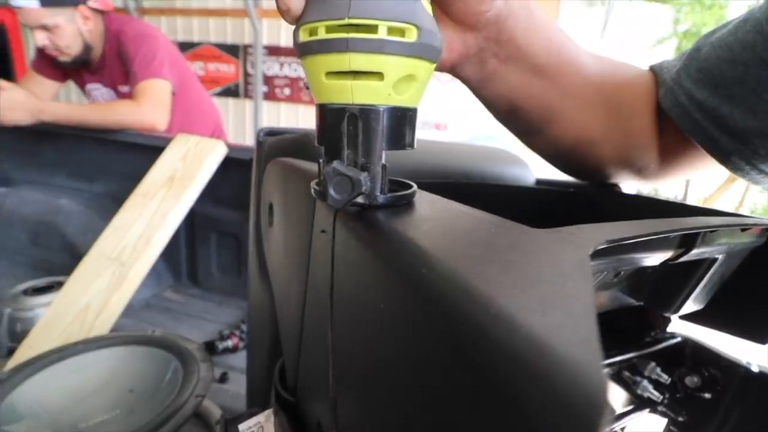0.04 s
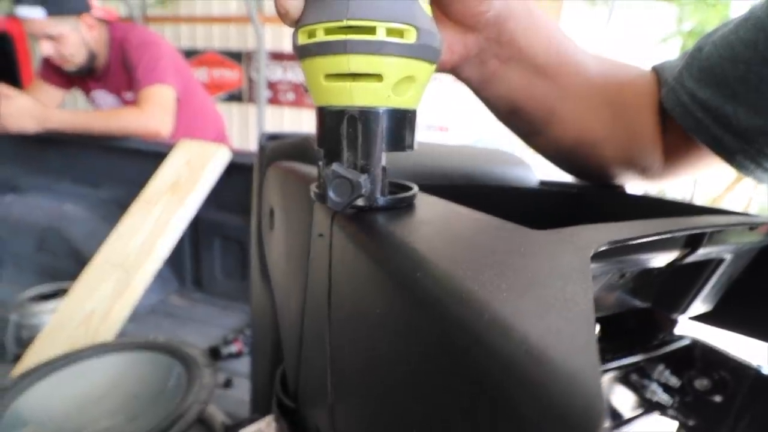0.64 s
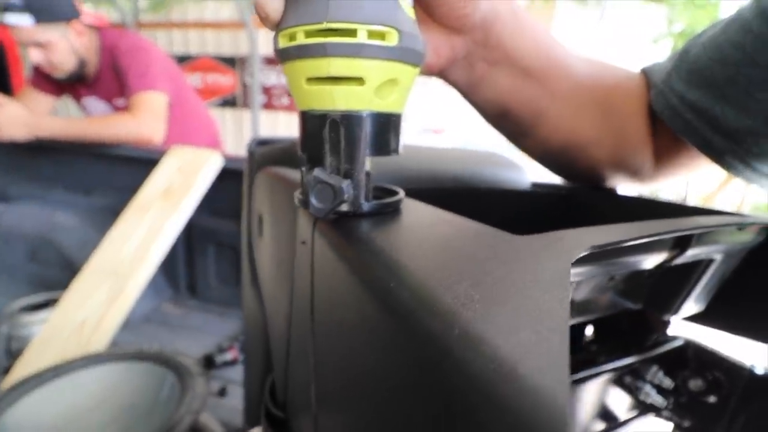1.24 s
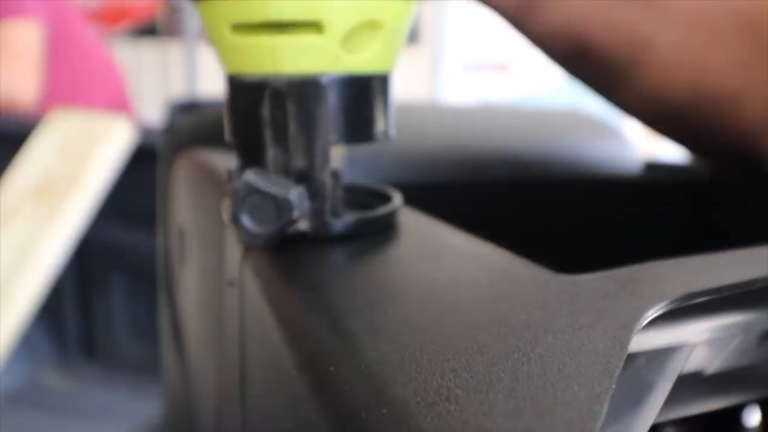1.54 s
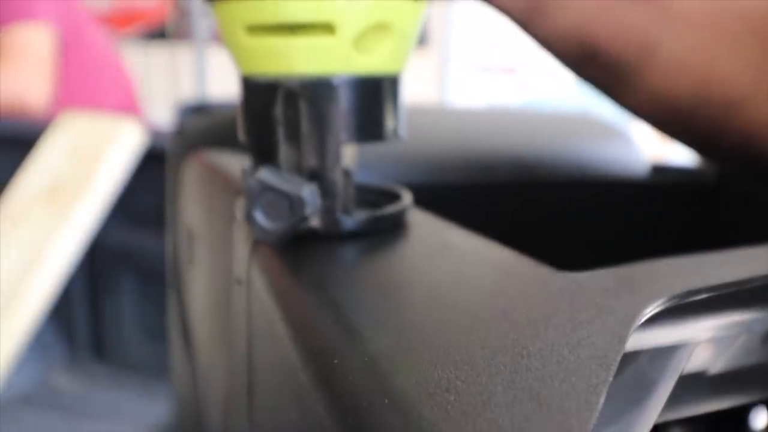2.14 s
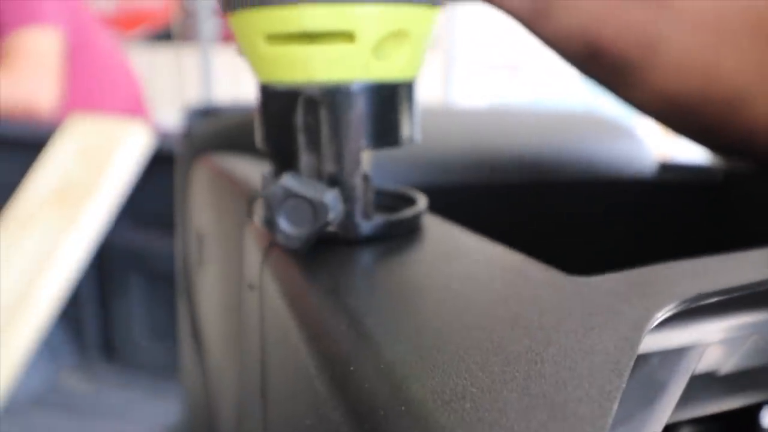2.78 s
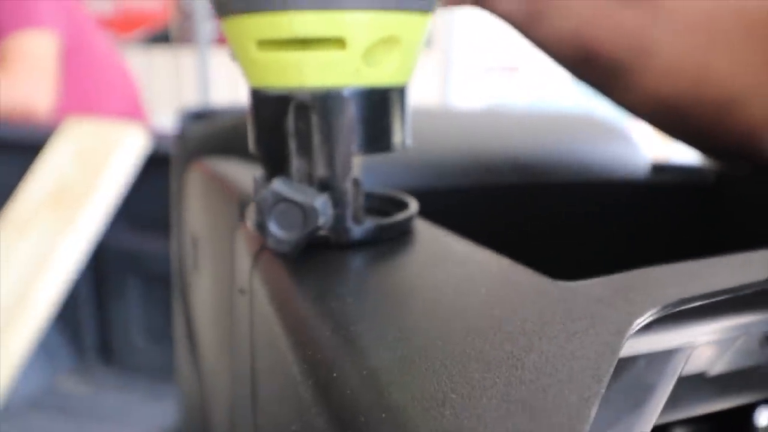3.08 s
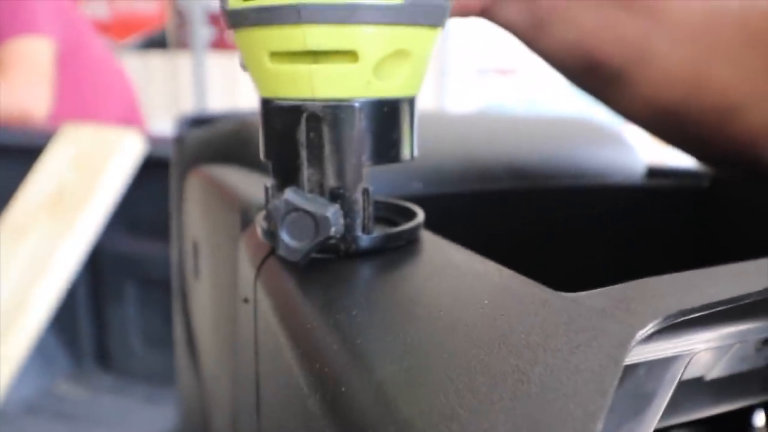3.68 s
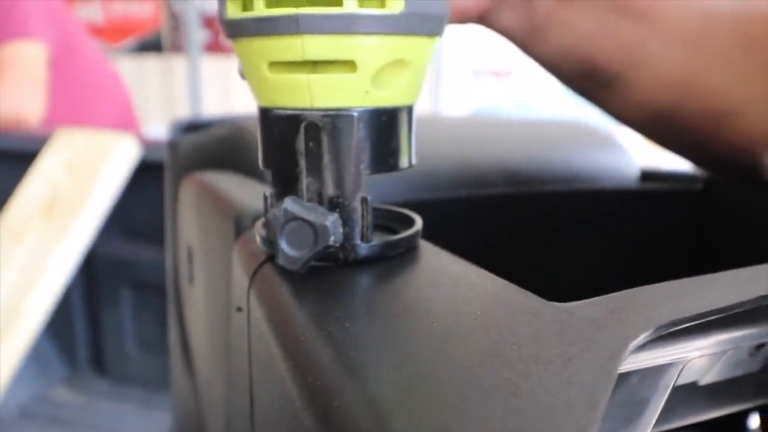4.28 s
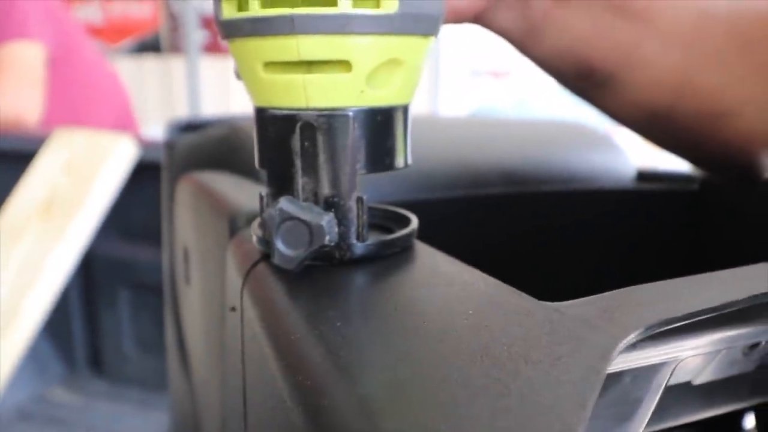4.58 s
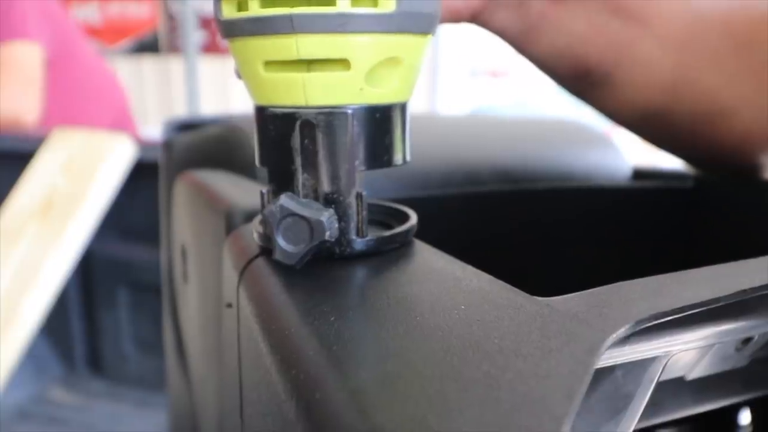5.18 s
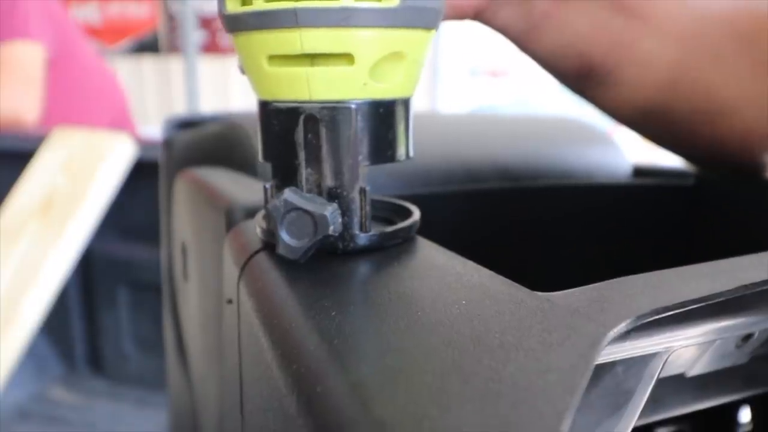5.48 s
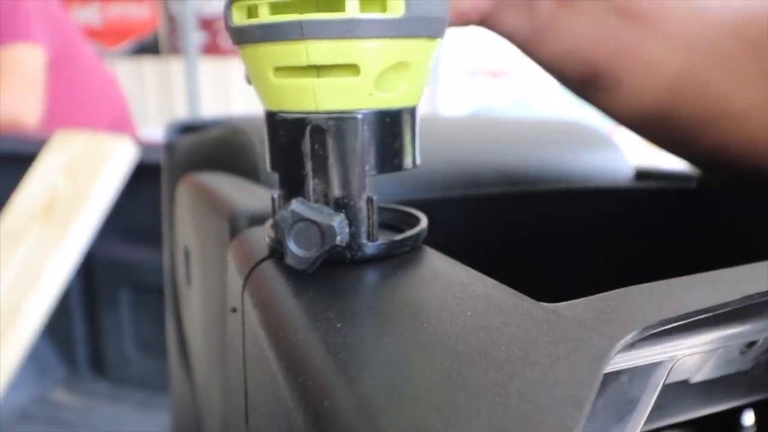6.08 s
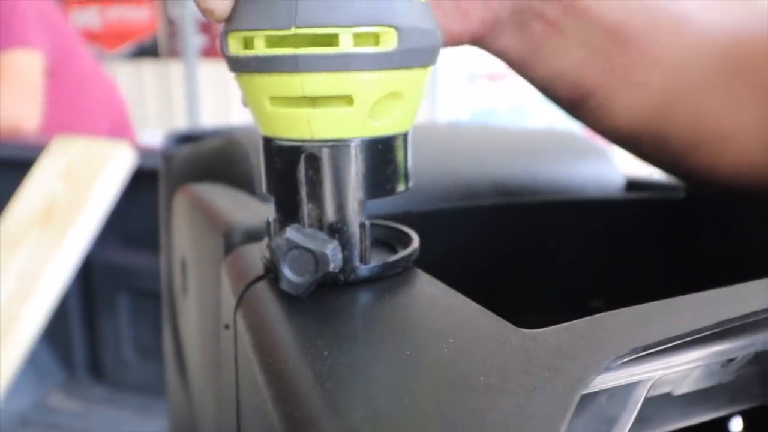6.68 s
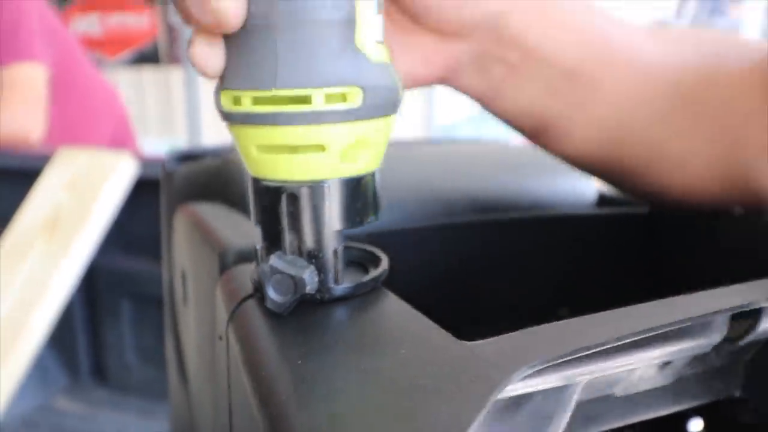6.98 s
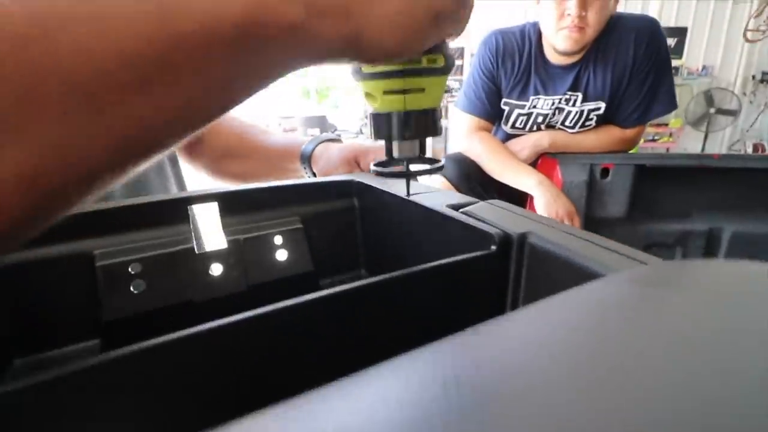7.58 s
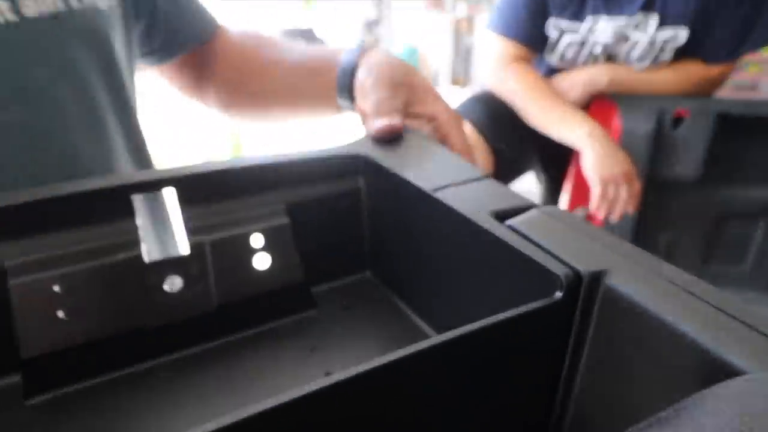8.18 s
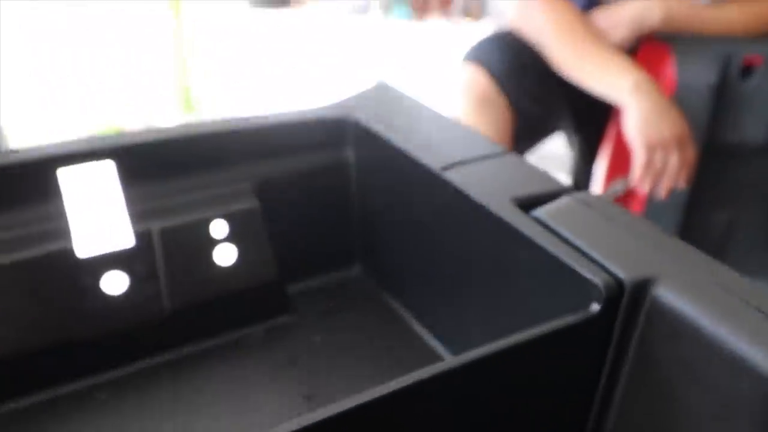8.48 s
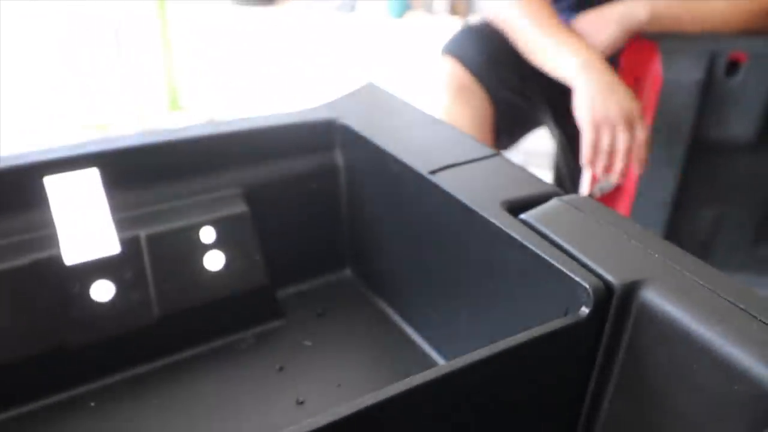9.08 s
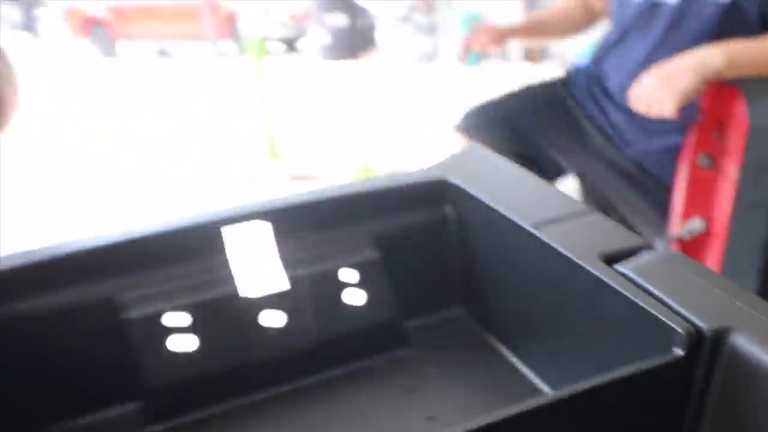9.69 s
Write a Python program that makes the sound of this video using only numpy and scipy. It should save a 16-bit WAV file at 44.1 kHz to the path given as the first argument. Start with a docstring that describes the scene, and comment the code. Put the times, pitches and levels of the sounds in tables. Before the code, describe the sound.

A small high-speed power tool whines steadily while cutting a hollow plastic panel, bites in with a rough rattle, then runs free.

```python
"""A steady hum and whine over hissing air: a cordless rotary cutter works along a plastic console.
The shaft, at about 24000 rpm, gives harmonics; its slower bearing cage puts tones between them, and
the cooling fan hisses. The base plate bumps the hollow panel, and the bit squeals and scrapes.
After a brief dropout near 7 s the bit bites deep and chatters its way out. The tool is then carried
around spinning freely, while the rumble of the workshop and the hum of a shop fan swell."""
import sys
import numpy as np
from scipy import signal
from scipy.fft import rfft, irfft
from scipy.io import wavfile

SR = 44100
rng = np.random.default_rng(int(sys.argv[2]) if len(sys.argv) > 2 else 0)


def log_audio(samples):
    """Write samples as a 16-bit WAV file to the path given in sys.argv[1]."""
    # one column per channel
    frames = np.atleast_2d(samples).T
    # limit to full scale, then quantise
    limited = np.clip(frames, -1, 1)
    pcm = np.round(limited * 32767).astype(np.int16)
    wavfile.write(sys.argv[1], SR, pcm)


N = 434385
TIME = np.arange(N) / SR
BAND_LIMIT_HZ = 15800
DROPOUT_S, RESUME_S, RESTORED_S = 7.027, 7.088, 7.102

# Progress of the work. Each row: time in seconds, stage (0 entering, 1 cutting, 2 biting deep, 3 free).
STAGE = [(0, 0), (1.48, 0), (1.5, 1), (7.04, 1), (7.08, 2), (7.6, 2), (7.75, 3), (9.85, 3)]
# Pressure of the deep bite. Each row: time in seconds, load from 0 to 1.
LOAD = [(7.04, 0), (7.08, 1), (7.21, 1), (7.29, .7), (7.34, 0)]
# Shaft speed. Each row: time in seconds, turns per second.
CUT_SPEED = [(0, 395.3), (1.46, 395.6), (1.51, 394.4), (1.9, 394.3), (3.1, 395.4), (4.29, 394.9),
             (4.5, 395.4), (5.1, 394.8), (5.5, 396.3), (5.72, 393), (5.79, 392.8), (5.91, 396.2),
             (6.08, 397.1), (6.21, 396.1), (7.03, 398.6)]  # sags where the bit catches
RECOVERY_SPEED = [(7.08, 383.8), (7.17, 384.7), (7.31, 382.5), (7.36, 386), (7.42, 386.1), (7.47, 392),
                  (7.62, 400), (7.99, 402), (8.4, 401.8), (9.5, 402.8), (9.85, 402.3)]  # dragged down by the deep bite, then recovering

# Shaft harmonics. Each row: order (multiple of the shaft rate), base level in dB at each of the stages.
HUM = [(1, -24, -30.5, -42, -31.5), (2, -33, -23, -29, -50.5), (3, -32, -31, -44, -38.5),
       (4, -28, -28, -28, -29.5)]
WHINE = [(5, -35.5, -39.5, -37, -40), (6, -34.5, -35.5, -34, -44.5), (7, -35.5, -35, -50, -44),
         (18, -32, -30.3, -44, -33)]  # the last row is the commutator
OVERTONES = [(8, -40, -43, -45, -47), (9, -52, -45, -43, -44), (10, -50, -38.5, -54, -36),
             (11, -43, -42, -44, -38), (12, -38.5, -36, -41, -40.5), (13, -33, -36, -54, -39.5),
             (14, -34, -36.5, -59, -37), (15, -39, -42.5, -57, -41), (16, -47, -53, -49, -52),
             (17, -47, -58, -58, -42), (19, -47, -41.5, -53, -46), (20, -59, -62, -51, -45),
             (21, -54, -50.5, -56, -42), (22, -58, -101, -49.5, -46), (24, -45, -47.5, -52, -51),
             (26, -45, -51, -47, -74), (30, -45, -56, -50, -54), (33, -56, -53, -66, -63)]
# Swings of single harmonics. Each row: time in seconds, gain in dB.
UNBALANCE_GAIN = [(1.47, -2.5), (1.5, 3), (2.7, 0), (3.1, 2), (3.8, 2), (4.9, -2.5), (6.4, -2.5),
                  (7.03, -0.5), (7.08, 4)]  # order 1
FEED_GAIN = [(0.15, -11), (0.45, -0.5), (1.47, 1), (1.5, -2.5), (2.4, -4), (3.1, -1.5), (4.5, 0.5),
             (5.3, 4.5), (5.72, 2), (6.15, 4), (6.85, 0.5), (7.08, 0.5)]  # order 2, driven by feed pressure
THIRD_GAIN = [(0, -11), (0.6, -8.5), (1.3, 1), (2.2, -3), (3.6, 2.5), (4.9, 0), (5.8, -1.5), (6.4, 3),
              (7.08, 9)]
FOURTH_GAIN = [(0, 3), (0.3, 3), (1.47, -3.5), (1.5, -24), (2.2, -6), (2.65, -0.5), (3.3, 0.5), (3.8, 4.5),
               (4.2, 3.5), (4.9, -5.5), (5.3, 3), (5.7, 1), (7.08, -2)]  # varies as the base plate slides
SIXTH_GAIN = [(0, 2), (0.5, -12), (1.5, 5.5), (2.4, 4), (2.68, -4), (2.87, 7), (3.35, 7), (3.9, -1),
              (5.1, -1), (5.35, -12), (5.75, 3.5), (7.08, 2)]
SEVENTH_GAIN = [(0, 6), (1.2, 3), (2.3, -1.5), (2.7, 0.5), (4.1, -2.5), (5.1, 0.5), (6.0, 4.5), (6.48, 1.5),
                (6.6, -8), (7.03, -8), (7.08, 13)]
COMMUTATOR_GAIN = [(0, -1), (0.5, -2.5), (1.47, 3.5), (1.5, 1), (3.0, 1.2), (5.3, 0.3), (6.5, -3.5),
                   (7.03, -5), (7.08, -6)]
# Motion of the lifted tool. Each row: time in seconds, gain in dB.
APPROACH_GAIN = [(7.6, -3), (7.75, -15.5), (8.05, -15.5), (8.5, -8.5), (8.9, -2), (9.75, 1.5), (9.85, -3.5)]  # coming nearer raises the hum and the lowest bearing tone
COMMUTATOR_BEAM = [(7.75, -5), (8.13, 2.5), (8.27, -8), (8.36, 5), (8.5, -12), (8.6, 1), (8.95, 3.5),
                   (9.15, -1), (9.53, 11.5), (9.63, 7.5), (9.7, -9)]  # the vents sweep the whine past the listener

# Strong bearing tones, one cage rate above a harmonic.
# Each row: shaft order, base level in dB at each stage, drift along the cut in dB per second.
BEARING_TONES = [(3, -38.5, -45, -44, -26.5, 0), (4, -34.5, -33, -44, -28, -2.5),
                 (6, -36, -40.5, -55, -28, -3)]
# Beaming of the upper two. Each row: time in seconds, gain of the lower in dB, of the higher in dB.
BEARING_BEAM = [(7.7, -8, -5), (7.8, -2, 1.5), (8.25, 5, 3), (8.4, 3.5, -3), (8.55, -3, 0), (8.8, -4.5, 5),
                (8.93, 1, -2.5), (9.17, 3, 1), (9.5, -12, -6.5), (9.75, 4.5, -2)]
# Faint bearing tones. Each row: shaft order, cage rates added, base level in dB at each stage.
SIDEBANDS = [(1, 1, -46.5, -44.5, -51.5, -62), (2, -1, -57, -55.5, -53, -70), (2, 1, -42.5, -40, -60, -48),
             (3, -1, -54, -49, -57, -51), (4, -1, -50, -42.5, -42, -37.5), (3, 2, -53, -45.5, -59, -48),
             (5, -1, -51, -55, -50, -42.5), (4, 2, -56, -59, -56, -53), (5, 1, -47, -48, -32.5, -40.5),
             (6, -1, -59, -61, -39, -42), (5, 2, -56, -61, -52.5, -40), (7, 1, -41, -45.5, -55, -37.5),
             (8, 1, -43, -70, -37, -45), (9, 1, -39, -49.5, -44, -39)]

# Spectra of the hiss. Each row: frequency in Hz, relative level in dB.
HISS_ON_PANEL = [(120, -22), (590, -21), (880, -12.5), (1620, -8.5), (1950, -10.5), (2410, -6),
                 (3480, -0.5), (3820, 5), (4450, -3.5), (5600, 5), (6700, -0.5), (7900, -2.5), (8600, -6.5),
                 (12400, -3.5), (13400, -11), (15600, -15)]
HISS_IN_AIR = [(120, -16.5), (200, -18.5), (610, -13), (980, -8.5), (1390, -1.5), (1620, -7.5), (2010, -5),
               (2340, 0.5), (3820, 5), (4870, 0.5), (5510, 4), (8720, -6), (11490, -6), (15600, -18)]
# Middle, main and top bands of the hiss. Each row: lower edge in Hz, upper edge in Hz.
HISS_BANDS = [(900, 2600), (2600, 7800), (8000, 15000)]
# Hiss before the dropout. Each row: time in seconds, main band level in dB.
HISS_CUTTING = [(0, -22.5), (0.4, -23.5), (1.45, -23.5), (1.5, -24), (2.9, -24), (4.1, -26.5), (5.2, -24.5),
                (5.6, -27), (7.03, -27.5)]
# The hiss dips under the loud bite, then swells and fades as the tool runs free.
# Each row: time in seconds, main band level in dB, middle and top bands in dB relative to that.
HISS_LEVEL = [(7.17, -30.5, -3, -7), (7.24, -34.5, -3, -7), (7.41, -30, 1, -12.5), (7.57, -25.5, -4, -9),
              (7.74, -28.5, -5, -7), (7.82, -25, -7, -10), (8.07, -23, -7.5, -6), (8.15, -23.5, -7.5, -11),
              (8.28, -29, 0, -8), (8.6, -31, -3, -8.5), (9.02, -27, -3.5, -11.5), (9.74, -24.5, -1, -10)]

# Spectrum of the workshop rumble. Each row: frequency in Hz, relative level in dB.
RUMBLE_SPECTRUM = [(20, -1.5), (45, -7.5), (80, -1.5), (115, -2.5), (160, -1), (300, -5), (600, -19.5),
                   (2000, -43)]
# Background sounds, swelling near the end. Each row: time in seconds, level in dB.
RUMBLE_LEVEL = [(0, -55), (2.6, -52.5), (4.2, -54.5), (6.3, -53), (7.0, -48.5), (7.08, -67), (7.5, -51),
                (8.2, -50), (9.3, -39), (9.85, -39)]
SHOP_FAN_LEVEL = [(0, -66), (8.4, -67), (9, -50.5), (9.4, -41.5), (9.85, -38)]
# Base plate on the panel. Each row: start in seconds, level in dB, pitch in Hz, 60 dB decay in seconds.
BUMPS = [(.14, -32, 340, .12), (1.485, -22, 400, 0.11), (3.14, -25, 358, .2), (4.03, -40, 360, .12),
         (4.74, -28, 362, 0.14), (5.62, -34, 390, .2), (5.8, -22, 373, 0.21), (6.594, -26.5, 280, .1),
         (7.605, -19, 392, 0.13)]
# Knocking of the bit. Each row: time in seconds, level in dB.
KNOCK_LEVEL = [(1.48, -80), (1.51, -49), (2.82, -48), (2.9, -80)]
# Faint tones beside the low harmonics. Each row: time in seconds, offset in Hz, level in dB.
BEAT = [(3.0, 146, -66), (3.6, 140, -57), (4.3, 113, -55.5), (5.0, 113, -52), (5.45, 108, -53),
        (5.7, 200, -75)]

# Catches of the bit. Each row: start in seconds, length in seconds, shaft order, level in dB.
SQUEALS = [(5.42, 0.079, 4, -21), (5.597, 0.14, 1, -25.5), (5.747, 0.05, 4, -20.5), (5.771, 0.054, 1, -24),
           (5.776, .04, 6, -26), (5.836, 0.069, 4, -19.5), (6.1, .09, 4, -23), (6.345, .12, 4, -25.5),
           (6.527, .5, 3, -21.5), (6.6, .24, 1, -28.5), (7.062, .15, 3, -17.5), (7.065, 0.2, 4, -19.5),
           (7.227, 0.023, 3, -24), (7.275, 0.15, 4, -21), (7.297, .11, 2, -21.5), (7.331, 0.034, 1, -29),
           (7.41, .035, 6, -30), (7.478, 0.16, 1, -31), (7.494, 0.094, 2, -25.5)]
# Dips around a catch. Each row: centre in seconds, half width in seconds, shaft order, gain in dB.
FALTERS = [(5.57, 0.015, 1, -19), (5.72, 0.027, 2, -2.5), (5.715, .018, 3, -14), (5.765, .01, 1, -7),
           (5.81, .025, 2, -2), (6.48, 0.022, 1, -13), (6.53, .015, 4, -11), (7.22, .04, 1, -7),
           (7.275, 0.0091, 4, -15), (7.33, .02, 3, -8), (7.44, .02, 2, -5), (7.58, .07, 4, -8),
           (7.7, 0.035, 2, 2)]
# Scrapes on the wall of the cut. Each row: start in seconds, length in seconds, level of the hollow
# panel in dB, level of its thin edge in dB, gain that the chips give the hiss in dB.
SCRAPES = [(5.607, .13, -48, -38, 1.5), (5.758, 0.065, -52, -49, 2), (6.696, 0.17, -44, -49, 0.7),
           (7.08, 0.16, -51, -34, -0.5), (7.298, 0.017, -48, -43, 6.5), (7.333, 0.28, -37, -48, 0.5),
           (7.632, 0.087, -41, -48, 4), (7.663, 0.021, -54, -50, 5)]
# Resonances rung by scraping. Each row: frequency in Hz, bandwidth in Hz.
PANEL_MODES = [(520, 170), (630, 150)]
EDGE_MODE = (1085, 85)

# Bursts of bouncing. Each row: start in seconds, length in seconds, level in dB.
CHATTER_BURSTS = [(7.348, .035, -28), (7.388, 0.026, -23), (7.437, 0.165, -30), (7.593, 0.029, -18),
                  (7.636, 0.073, -21)]
# The bounces quicken as the bit comes free. Each row: time in seconds, bounces per second.
BOUNCE_RATE = [(7.41, 380), (7.62, 412)]
# Resonances rung by bouncing.
# Each row: frequency in Hz, bandwidth in Hz, weight in dB inside the cut, weight in dB at the rim.
CHATTER_MODES = [(810, 55, 1, -3), (1250, 320, -22, -4), (1694, 120, 1, -1), (2460, 110, -19, -9),
                 (3337, 90, -6, 2), (3800, 150, -22, 2)]


def amp(db):
    """Amplitude grows tenfold for every 20 dB."""
    return 10 ** (np.asarray(db) / 20)


def unit(x):
    """Normalisation to an rms of 1."""
    return x / np.sqrt(np.mean(abs(x) ** 2) + 1e-20)


def curves(rows, t=TIME):
    """Linear interpolation in time, giving one curve for each value column."""
    times, *columns = np.transpose(rows)
    return [np.interp(t, times, column) for column in columns]


def spectrum_db(points, hz):
    """A spectral envelope, interpolated on a log-frequency axis."""
    f, db = np.transpose(points)
    return np.interp(np.log(hz + 1), np.log(f + 1), db)


def wander(rate_hz, size=8192):
    """Random modulation: complex noise of rms 1, low-passed at the given rate."""
    f = np.fft.fftfreq(size, N / SR / size)
    noise = rng.standard_normal(size) + 1j * rng.standard_normal(size)
    slow = np.fft.ifft(noise / (1 + (f / rate_hz) ** 2))
    return np.interp(TIME, np.linspace(0, N / SR, size), unit(slow))


def resonate(x, hz, width_hz):
    """Forced response of one damped mode, with a gain of 1 at resonance."""
    radius = np.exp(-np.pi * width_hz / SR)
    return 2 * signal.lfilter([1 - radius], [1, -radius * np.exp(2j * np.pi * hz / SR)], x).real


def tone(turns, db, flutter, flutter_hz):
    """A sinusoid under random amplitude and phase modulation, as from a trembling hand."""
    shake = (1 + flutter * wander(flutter_hz)) / np.sqrt(1 + flutter ** 2)
    angle = 2 * np.pi * ((turns + rng.random()) % 1)
    return np.sqrt(2) * amp(db) * (shake * np.exp(1j * angle)).real


def burst(start, length, attack_s, release_s, t=TIME):
    """A trapezoidal envelope: attack, hold to the end of the length, release."""
    return np.interp(t - start, [0, min(attack_s, length), length, length + release_s], [0, 1, 1, 0])


def staged(levels_db):
    """A level interpolated between its values at the four stages."""
    times, stage = np.transpose(STAGE)
    return np.interp(TIME, times, np.asarray(levels_db)[stage.astype(int)])


def during(stage):
    """A crossfade weight: 1 in the given stage, 0 in the others."""
    return np.clip(1 - abs(curves(STAGE)[0] - stage), 0, 1)


def lifted(t=TIME):
    """A crossfade weight: 0 with the tool on the panel, 1 once it runs free."""
    return np.clip(curves(STAGE, t)[0] - 2, 0, 1)


def along_cut(levels_db, db_per_s, middle_s=4.32):
    """A staged level with a linear drift as the tool travels along the cut."""
    return staged(levels_db) + db_per_s * (TIME - middle_s) * during(stage=1)


def flutter_depth(held, free):
    """Modulation depth: smaller while the panel steadies the tool, larger once it is lifted."""
    return held + (free - held) * lifted()


def motor(turns, fading_db=4.0, judder=0.066, near_share=0.32):
    """Periodic motion radiates harmonics of the shaft rate: hum, whine and faint overtones."""
    free = lifted()
    approach = free * curves(APPROACH_GAIN)[0]
    # the lesser tones of the lifted tool swell and fade with its hiss
    swell = free * (curves(HISS_LEVEL)[0] + 23.5)
    nearer = swell + near_share * approach
    swing_db = {1: curves(UNBALANCE_GAIN)[0] + approach,
                2: curves(FEED_GAIN)[0] - swell,
                3: curves(THIRD_GAIN)[0] + nearer,
                4: curves(FOURTH_GAIN)[0] + nearer,
                5: swell + fading_db * wander(rate_hz=1.6).real,
                6: curves(SIXTH_GAIN)[0] + swell,
                7: curves(SEVENTH_GAIN)[0] + swell,
                18: curves(COMMUTATOR_GAIN)[0] + free * curves(COMMUTATOR_BEAM)[0]}
    level_db = {order: with_squeals(order, staged(db) + swing_db[order]) for order, *db in HUM + WHINE}
    scraping = sum(scrape_envelope(start, length) for start, length, *_ in SCRAPES)
    roughness = judder * scraping * (1 - curves(LOAD)[0])
    shake = flutter_depth(held=0.032, free=0.075) + roughness
    hum = sum(tone(order * turns, level_db[order], order * shake, flutter_hz=22.3) for order, *_ in HUM)
    tremble = flutter_depth(held=0.14, free=0.38) + roughness
    whine = sum(tone(order * turns, level_db[order], tremble, flutter_hz=8.4) for order, *_ in WHINE)
    # the commutator, order 18, carries a faint octave, weaker from the deep bite on
    octave_db = level_db[18] + np.interp(curves(STAGE)[0], [1, 2], [-21, -29])
    octave = tone(2 * 18 * turns, octave_db, flutter=0.4, flutter_hz=35)
    flutter = flutter_depth(held=0.3, free=0.58)
    high = sum(tone(order * turns, staged(db), flutter, flutter_hz=11.5) for order, *db in OVERTONES)
    return hum + whine + octave + amp(swell) * high


def bearing(turns, cage, loaded_db=-14):
    """Modulation by the slower ball cage puts sidebands between harmonics; load quiets the faint ones."""
    swings_db = curves(APPROACH_GAIN) + curves(BEARING_BEAM)
    strong = faint = 0
    for (order, *db, drift), swing_db in zip(BEARING_TONES, swings_db):
        level_db = along_cut(db, drift) + lifted() * swing_db
        strong += tone(order * turns + cage, level_db, flutter=0.28, flutter_hz=2.2)
    fraying = flutter_depth(held=0.22 + 0.1 * TIME, free=1.0)
    for order, cages, *db in SIDEBANDS:
        faint += tone(order * turns + cages * cage, along_cut(db, db_per_s=-0.8), fraying, flutter_hz=3.7)
    return strong + amp(loaded_db * curves(LOAD)[0]) * faint


def hiss_levels(t, middle_db=-7.5, top_db=-11, chip_brightness=0.36):
    """Envelopes in dB of the middle, main and top bands of the hiss; chips from scrapes add to them."""
    cutting = np.broadcast_arrays(curves(HISS_CUTTING, t)[0], middle_db, top_db)
    main, middle, top = np.where(t < DROPOUT_S, cutting, curves(HISS_LEVEL, t))
    chips_db = sum(db * scrape_envelope(start, length, t) for start, length, _, _, db in SCRAPES)
    main = main + chips_db
    return main + middle, main, main + top + chip_brightness * chips_db


def air_hiss(turns, cage, low_cut_hz=230, grit_db=0.7, chip_grit_db=3, loaded_db=-2):
    """Fan air and chips make broadband noise, amplitude-modulated by each turn of shaft and cage."""
    hz, t, noise = signal.stft(rng.standard_normal(N), SR, nperseg=512, noverlap=384)
    free = lifted(t)
    on_panel_db = np.outer(spectrum_db(HISS_ON_PANEL, hz), 1 - free)
    in_air_db = np.outer(spectrum_db(HISS_IN_AIR, hz), free)
    shape = amp(on_panel_db + in_air_db + free * reflection_comb_db(hz, t))
    shape *= (hz ** 2 / (hz ** 2 + low_cut_hz ** 2))[:, None]
    # three overlapping bands, each brought to its own level
    middle = np.interp(hz, [2000, 3200], [1, 0])
    top = np.interp(hz, [7000, 9000], [0, 1])
    gain_db = 0
    for (low, high), share, db in zip(HISS_BANDS, (middle, 1 - middle - top, top), hiss_levels(t)):
        power = (shape[(hz > low) & (hz < high)] ** 2).sum(0) / len(hz)
        gain_db += np.outer(share, db - 10 * np.log10(power))
    hiss = signal.istft(noise * shape * amp(gain_db), SR, nperseg=512, noverlap=384)[1][:N]
    throb = 1 + 0.11 * np.cos(2 * np.pi * turns) + 0.1 * np.cos(2 * np.pi * cage)
    grit = amp((grit_db + chip_grit_db * during(stage=2)) * np.tanh(wander(rate_hz=200).real))
    return amp(loaded_db * curves(LOAD)[0]) * hiss * unit(throb * grit)


def workshop(fan_hz=113.2):
    """Ambient noise: a low broadband rumble and the tonal hum of a shop fan."""
    hz = np.fft.rfftfreq(N, 1 / SR)
    rumble = unit(irfft(rfft(rng.standard_normal(N)) * amp(spectrum_db(RUMBLE_SPECTRUM, hz)), N))
    fan = tone(fan_hz * TIME, curves(SHOP_FAN_LEVEL)[0], flutter=0.6, flutter_hz=5)
    return amp(curves(RUMBLE_LEVEL)[0]) * rumble + fan


def plate_bumps(rise_s=0.0041):
    """Damped free vibration: each slip of the base plate rings the hollow panel briefly."""
    out = np.zeros(N)
    t = TIME[:SR // 2]
    for start, db, hz, t60 in BUMPS:
        envelope = amp(db - 60 * t / t60) * (1 - np.exp(-t / rise_s))
        out[round(start * SR):][:len(t)] += envelope * np.sin(2 * np.pi * hz * t)
    return out


def bit_knock(turns):
    """Period doubling: a knock on every second turn sounds a tone at one and a half shaft rates."""
    return tone(1.5 * turns, curves(KNOCK_LEVEL)[0], flutter=0.3, flutter_hz=10)


def beating_tones(turns):
    """Faint side tones beat with the first two harmonics at their difference frequency."""
    offset_hz, db = curves(BEAT)
    beat = np.cumsum(offset_hz) / SR
    flanks = (turns - beat, turns + beat, 2 * turns - beat)
    return sum(tone(flank, db, flutter=0.36, flutter_hz=5.6) for flank in flanks)


def with_squeals(order, db):
    """Forced vibration: where the bit catches, the panel's squeal adds power to a harmonic; it also dips."""
    squeals = sum(amp(peak_db) * burst(start, length, attack_s=0.021, release_s=0.058)
                  for start, length, k, peak_db in SQUEALS if k == order)
    dips_db = sum(dip_db / (1 + ((TIME - centre) / width) ** 4)
                  for centre, width, k, dip_db in FALTERS if k == order)
    return 20 * np.log10(np.hypot(amp(db), squeals)) + dips_db


def scrape_envelope(start, length, t=TIME):
    """The envelope of one contact between the bit and the wall of the cut."""
    return burst(start, length, attack_s=0.0087, release_s=0.0088, t=t)


def wall_scrapes():
    """Friction noise excites the resonances of the hollow panel and its thin edge."""
    friction = rng.standard_normal(N)
    *panel, edge = (unit(resonate(resonate(friction, *mode), *mode))
                    for mode in PANEL_MODES + [EDGE_MODE])
    hollow = unit(sum(panel))
    return sum(scrape_envelope(start, length) * (amp(panel_db) * hollow + amp(edge_db) * edge)
               for start, length, panel_db, edge_db, _ in SCRAPES)


def bearing_whistle(turns, cage):
    """Side load late in the cut excites one high sideband of the bearing."""
    envelope = burst(start=6.5, length=0.24, attack_s=0.088, release_s=0.03)
    return envelope * tone(8 * turns + cage, db=-33, flutter=0.8, flutter_hz=30)


def flute_buzz(turns, level_db=-35, low_hz=4900, slope=1.3, waver_db=3, size=256):
    """Periodic tearing: in the deep bite the flute repeats one jagged stroke, rich in high harmonics."""
    order = np.arange(size // 2 + 1)
    hz = order * np.mean(np.transpose(CUT_SPEED)[1])
    jagged = rng.uniform(0.4, 1, len(order)) * np.exp(2j * np.pi * rng.random(len(order)))
    in_band = (hz > low_hz) & (hz < BAND_LIMIT_HZ)
    stroke = unit(irfft(in_band * jagged / (order + 1) ** slope))
    buzz = np.interp(turns % 1, np.arange(size) / size, stroke, period=1)
    return buzz * curves(LOAD)[0] * amp(level_db + waver_db * wander(rate_hz=21).real)


def bit_chatter(jitter=0.022, uneven=0.6, rim_s=7.63, blend_s=0.025):
    """An impulse train of uneven bounces rings the panel, brighter once the bit rides up on the rim."""
    rate = curves(BOUNCE_RATE)[0] * (1 + jitter * wander(rate_hz=90).real)
    bounces = np.diff(np.floor(np.cumsum(rate) / SR), prepend=0)
    bounces *= 1 + uneven * np.tanh(2 * wander(rate_hz=150).real)
    bounces -= bounces.mean()
    # neighbouring modes swing in opposite directions
    rings = np.array([(-1) ** k * resonate(bounces, hz, width)
                      for k, (hz, width, *_) in enumerate(CHATTER_MODES)])
    in_cut, at_rim = (unit(amp(weights_db) @ rings) for weights_db in np.transpose(CHATTER_MODES)[2:])
    rim_share = np.clip((TIME - rim_s) / blend_s + 0.5, 0, 1)
    contact = sum(amp(db) * burst(start, length, attack_s=0.007, release_s=0.017)
                  for start, length, db in CHATTER_BURSTS)
    return contact * ((1 - rim_share) * in_cut + rim_share * at_rim)


def reflection_comb_db(hz, t, depth_db=2.0, delay_s=0.000687, swing_s=0.00024):
    """Interference with a reflection off the panel combs the hiss; the comb slides as the tool moves."""
    delay = delay_s + swing_s * np.interp(t, TIME, wander(rate_hz=0.59).real)
    return depth_db * np.cos(2 * np.pi * np.outer(hz, delay))


def scene(speed_jitter_hz=0.1474, cage_ratio=0.407, cage_slip_hz=1.19):
    """Superposition of all sources, alike in both ears; the tool's tones follow one shaft."""
    speed = curves(CUT_SPEED + RECOVERY_SPEED)[0] + speed_jitter_hz * wander(rate_hz=10.6).real
    turns = np.cumsum(speed) / SR
    cage = np.cumsum(cage_ratio * speed + cage_slip_hz * wander(rate_hz=9.5).real) / SR
    tones = motor(turns) + bearing(turns, cage) + bearing_whistle(turns, cage)
    undertones = beating_tones(turns) + bit_knock(turns)
    hiss = air_hiss(turns, cage)
    contacts = flute_buzz(turns) + wall_scrapes() + bit_chatter() + plate_bumps()
    mono = tones + undertones + hiss + contacts + workshop()
    return np.array([mono, mono])


def record(dry, dropout_db=-62):
    """Gating and band limiting: the sound drops out for an instant, fades back in and is low-passed."""
    fade_in = np.clip((TIME - RESUME_S) / (RESTORED_S - RESUME_S), amp(dropout_db), 1)
    gate = np.where(TIME < DROPOUT_S, 1, fade_in)
    low_pass = signal.firwin(511, BAND_LIMIT_HZ, window=("kaiser", 9), fs=SR)
    return signal.oaconvolve(dry * gate, low_pass[None], "same", axes=1)


dry = scene()
out = record(dry)
log_audio(out)
```